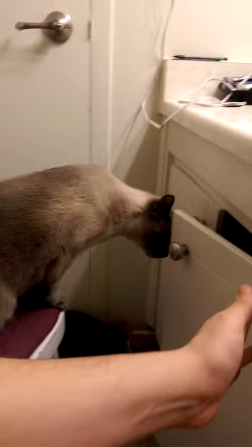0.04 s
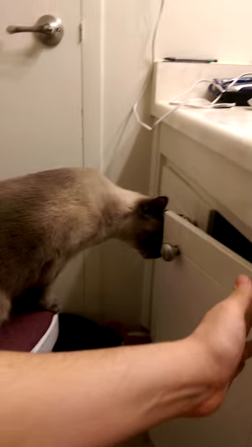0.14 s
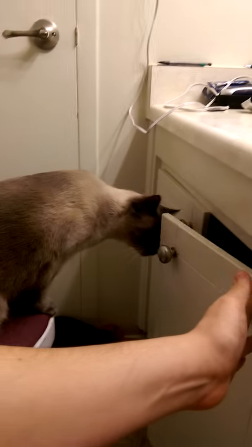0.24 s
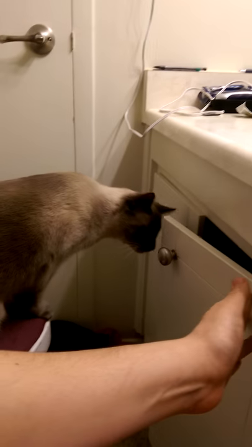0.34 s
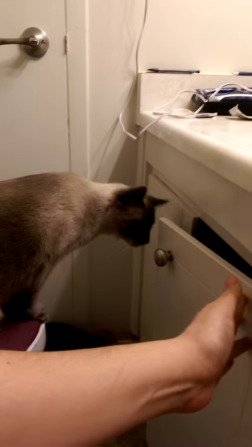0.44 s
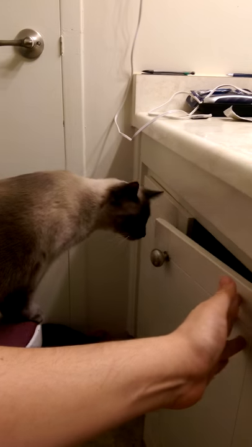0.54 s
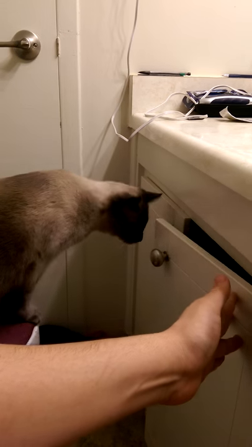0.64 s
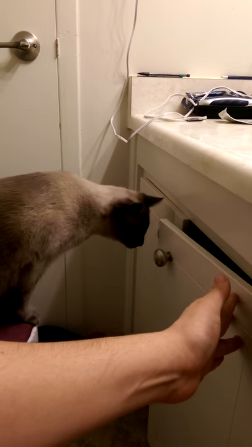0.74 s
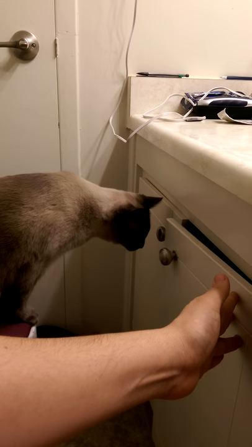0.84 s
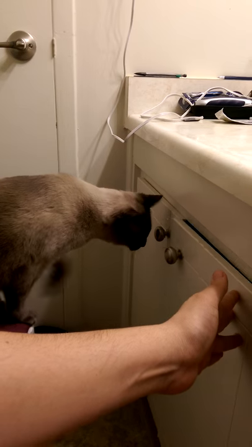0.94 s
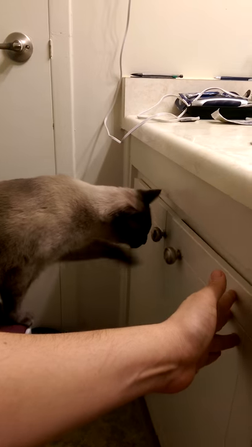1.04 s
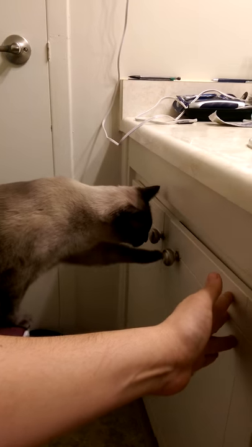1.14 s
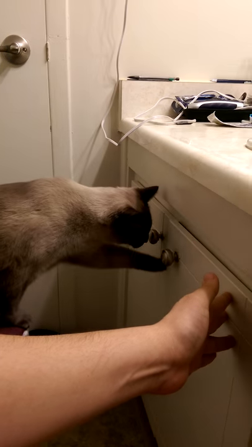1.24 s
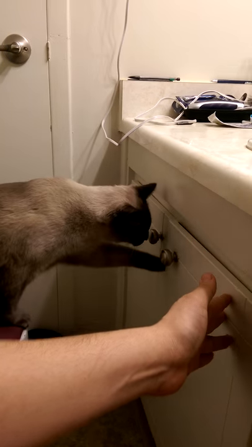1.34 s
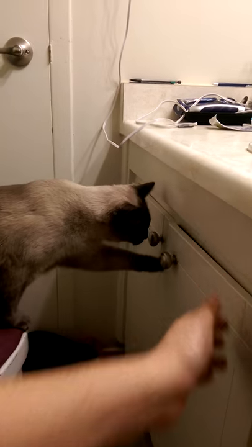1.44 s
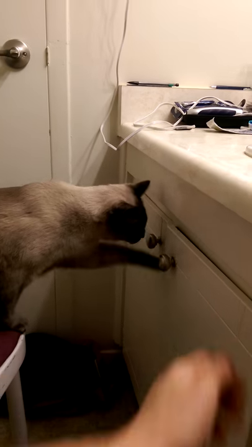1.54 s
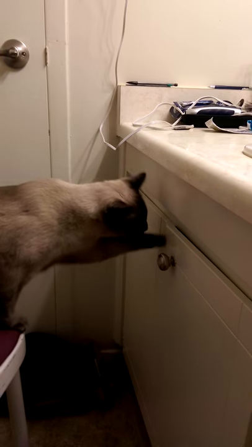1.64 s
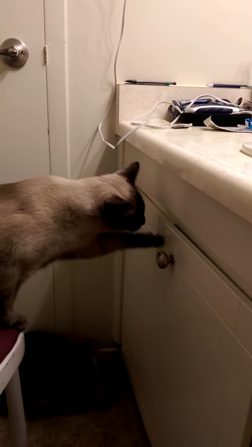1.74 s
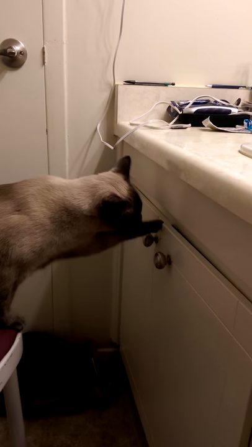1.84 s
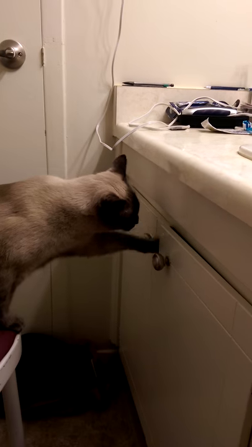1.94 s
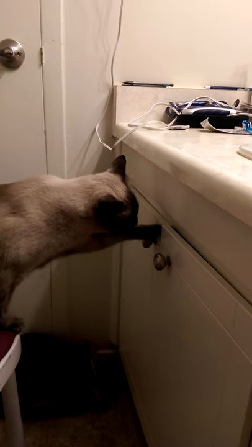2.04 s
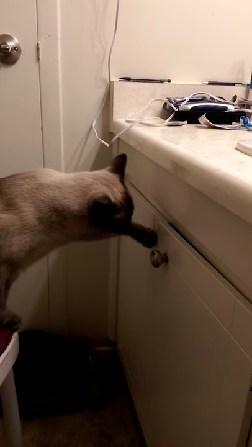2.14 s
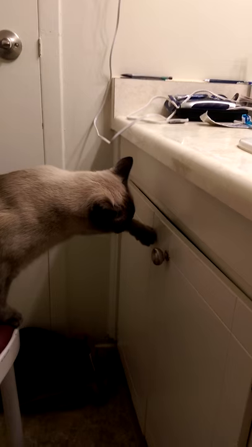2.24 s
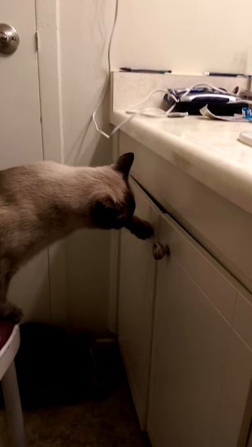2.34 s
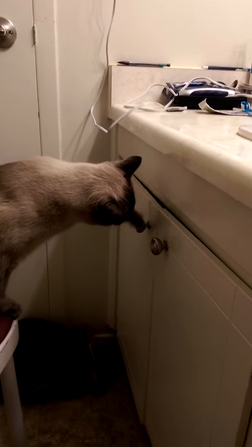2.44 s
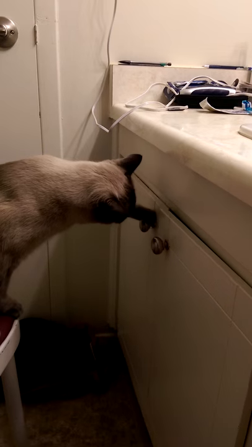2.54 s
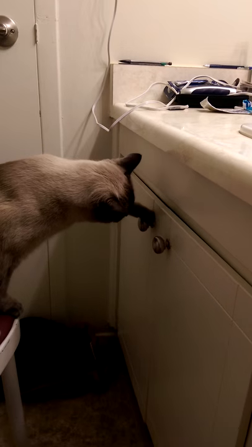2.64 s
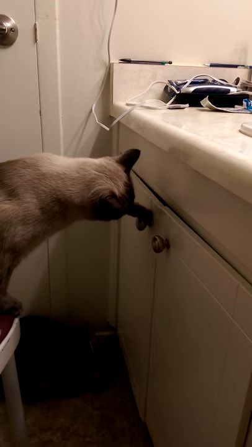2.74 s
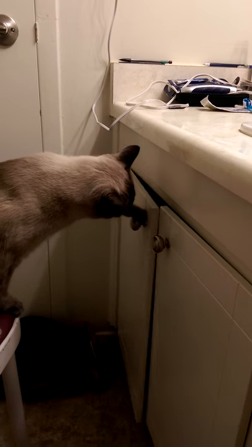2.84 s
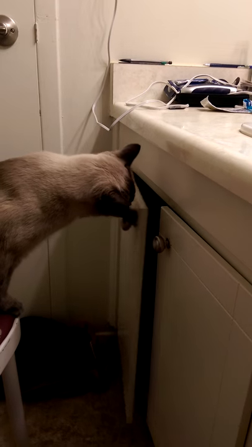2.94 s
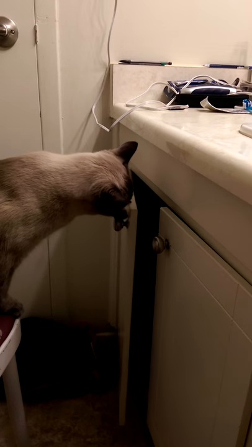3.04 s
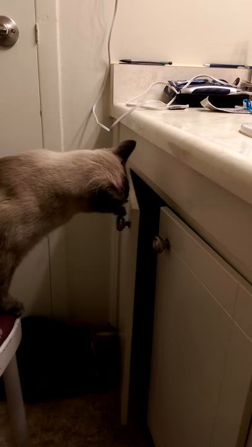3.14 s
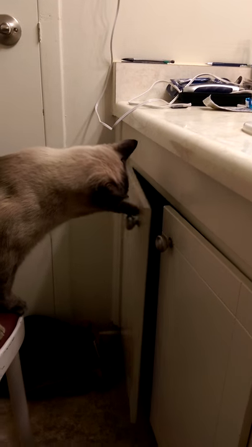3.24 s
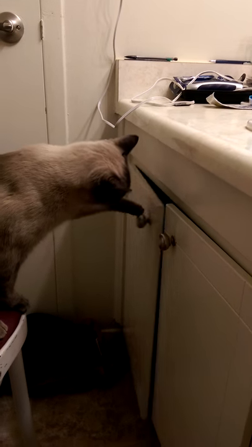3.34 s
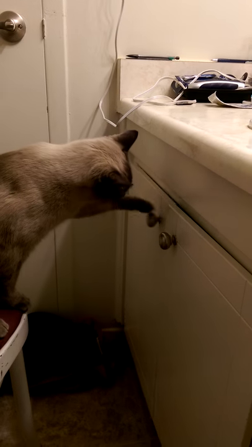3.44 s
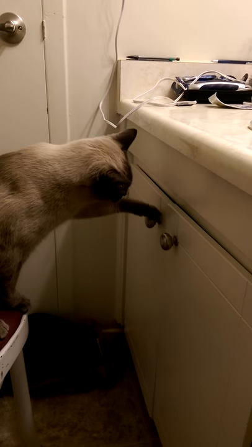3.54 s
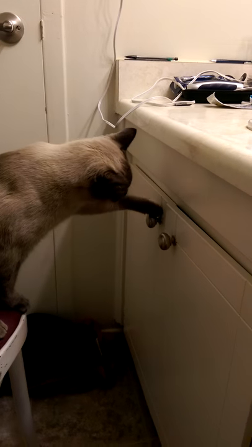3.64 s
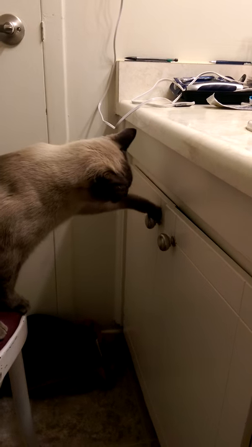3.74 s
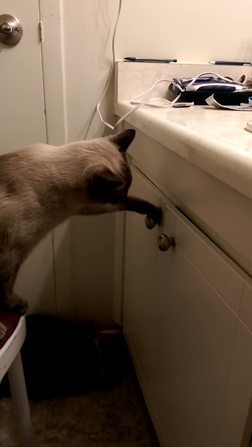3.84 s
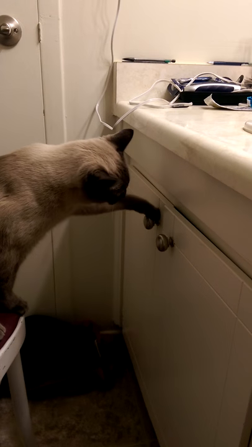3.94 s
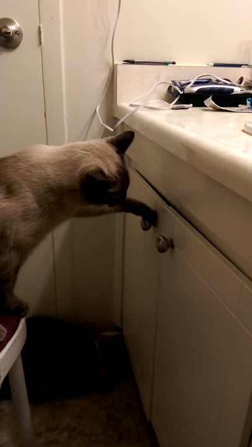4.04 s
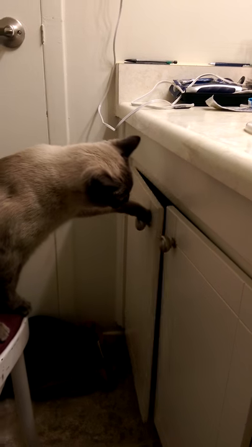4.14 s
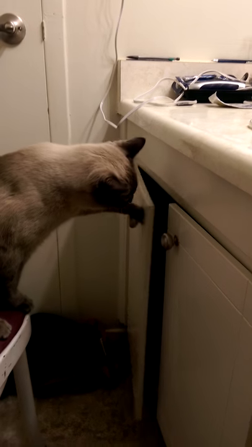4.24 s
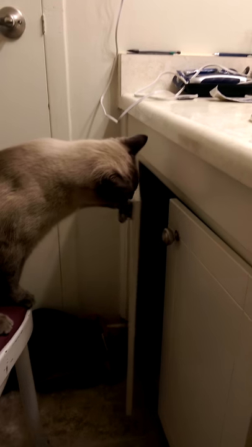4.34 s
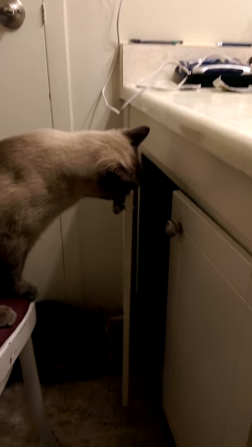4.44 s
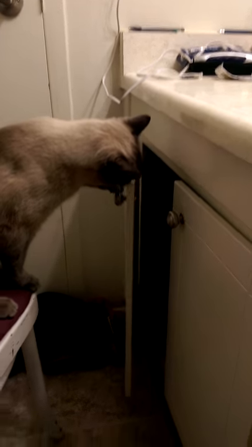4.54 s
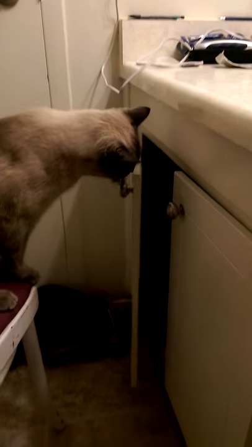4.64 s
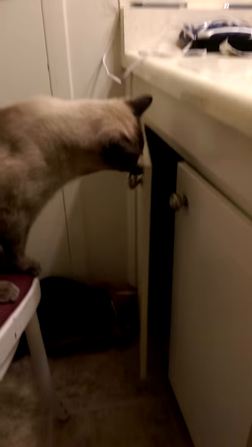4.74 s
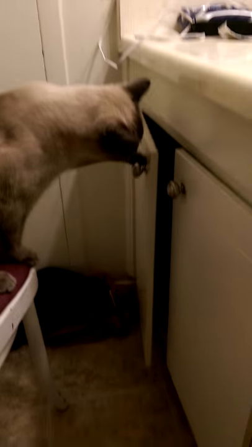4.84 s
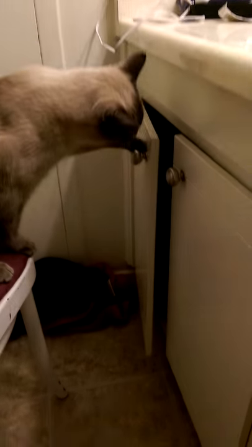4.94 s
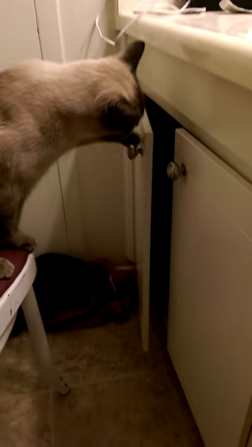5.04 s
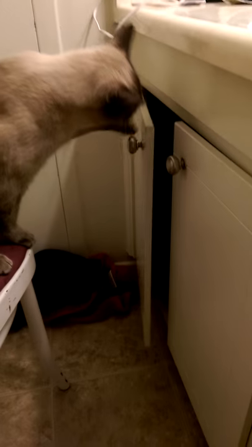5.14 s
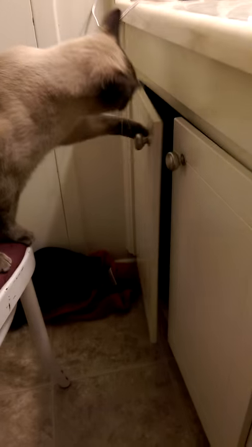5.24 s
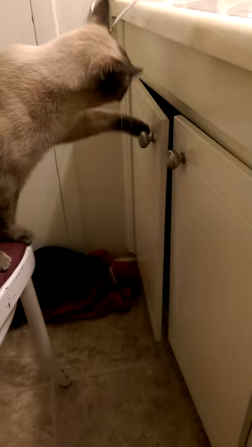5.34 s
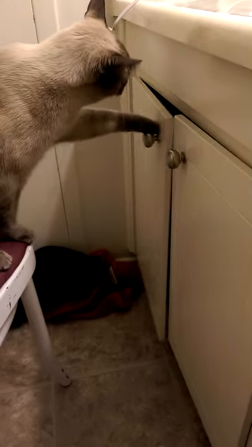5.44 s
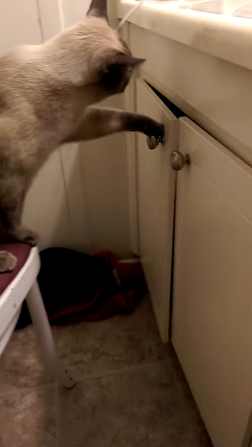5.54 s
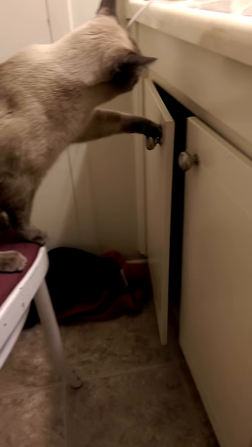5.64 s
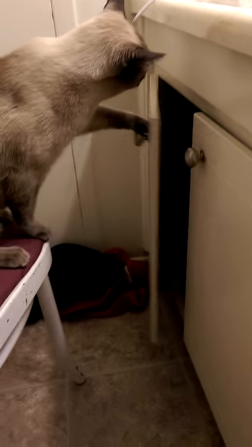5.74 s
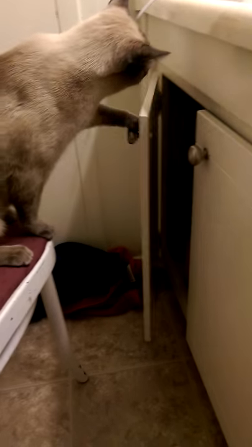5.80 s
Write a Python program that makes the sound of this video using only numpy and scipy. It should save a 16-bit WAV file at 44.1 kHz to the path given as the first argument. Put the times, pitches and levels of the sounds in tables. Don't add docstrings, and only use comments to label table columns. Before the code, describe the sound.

A cat paws at hollow cabinet doors: a dull shut, a quiet tap, then sharp slams and quick rattling in a small hard room.

```python
import sys
import numpy as np
from scipy import signal
from scipy.fft import rfft, irfft, next_fast_len
from scipy.io import wavfile

SR = 44100
rng = np.random.default_rng(int(sys.argv[2]) if len(sys.argv) > 2 else 0)


def invert_db(x):
    u = np.asarray(x, float) / 20
    return 10 ** u


def wav_out(sig):
    wavfile.write(sys.argv[1], SR, np.round(np.clip(np.atleast_2d(sig).T, -1, 1) * 32767).astype(np.int16))


N = 258867

# frequency in Hz, left-right likeness from -1 to 1.
ALIKE = [(60, 1), (190, .97), (320, 0.68), (640, 0.52), (1410, 0.094), (3100, -0.17), (6820, -0.3),
         (15000, -0.64)]
BANDS_HZ = np.geomspace(60, 14000, 13)


def unit(x):
    return x / np.sqrt(np.mean(x ** 2) + 1e-20)


def along(points, hz):
    f, v = np.transpose(points)
    return np.interp(np.log(hz + 1), np.log(f + 1), v)


def filtered(x, response):
    m = next_fast_len(x.shape[-1] + 4096)
    spectrum = rfft(x, m) * response(np.fft.rfftfreq(m, 1 / SR))
    return irfft(spectrum, m)[..., :x.shape[-1]]


def rush(size, spectrum, alike):
    def mid_and_side(hz):
        turn = np.arccos(np.clip(along(alike, hz), -1, 1)) / 2
        return invert_db(along(spectrum, hz)) * [np.cos(turn), np.sin(turn)]

    mid, side = filtered(rng.standard_normal((2, size)), mid_and_side)
    return unit(np.array([mid + side, mid - side]))


def add(out, s, x):
    out[:, round(s * SR):][:, :x.shape[1]] += x


def doors():
    # start in seconds, crack, treble, boom and first front in dB.
    blows = [
        (1.068, -17, -34, 1.5, 6),
        (1.1613, -23.5, -30, -4, 3),
        (2.2353, -34, -22.5, -5, -1.5),
        (2.613, -8.5, -21, -6, 2),
        (3.5415, -5.5, -19, -5.5, 0),
        (3.7292, -11, -23, -8, 0.5),
        (3.8842, -12.5, -23.5, -7, 3),
        (3.9604, -20.5, -34, -8, 1),
    ]
    strike_point = [0, 5, 4, 1, 2, 3, 3, 3]
    # frequency in Hz, level in dB, 60 dB decay in seconds.
    near_door = [(44.2, -19.5, 0.7), (103.7, -5.5, 0.3), (165.5, 2, 0.12), (186.3, 5.5, 0.24),
                 (208, -4.5, 0.35), (250, -7.5, 0.43), (358.7, 0.5, 0.18), (398.5, -19, 0.62),
                 (467.6, -6, 0.2), (490, -27, 0.47), (766.6, -22, 0.11), (1700, -18.5, 0.12),
                 (1740, -20, .1)]
    far_door = [(55.06, -8, .5), (72, -17, 0.3), (100, -9, 0.24), (135, -9.5, 0.078), (155.4, -1.5, 0.3),
                (212.5, 0, 0.43), (257.4, -1, 0.3), (281, -2, 0.3), (303.5, 5, 0.13), (363, -5, .32),
                (397, -7, .32), (418, -9.5, .27), (526, -11, 0.26)]
    slam = [(63.7, -2.5, 0.42), (117.6, -3.5, 0.27), (155.8, 2, 0.4), (210.7, -12, 1), (250.3, -3, 0.27),
            (338, -3.5, 0.28), (427, -7.5, 0.33), (485.7, -16, 0.52)]
    rattle = [(60.8, -8, 0.72), (82, 0, 0.23), (154.8, 1, 0.31), (222, -8.5, .5), (253.2, 1.5, 0.22),
              (339.5, -8.5, 0.35), (415.4, -4.5, .27), (528, -7.5, 0.33)]
    tap = [(60, -7, 0.5), (102, -8.5, 0.41), (159, -8.5, 0.75), (210.7, 0, 0.21), (248.7, 2.5, 0.27),
           (281.2, -4.5, .2), (395.4, -18, 0.15), (478, -7, 0.23), (1713, 2.5, 0.1), (1900, 4.5, 0.107),
           (2070, -1.5, 0.09)]
    rebound = [(64.7, -1, .6), (92.8, -10, 0.66), (127.1, 0, 0.44), (168.4, -2, 0.48), (192, 1.5, 0.25),
               (210.2, 5, 0.39), (223, -20, 0.25), (322, -21, 0.24), (432, -16.5, .25), (556, -20, 0.33),
               (745, -28, 0.19)]
    # frequency in Hz, level in dB, 60 dB decay in seconds.
    panel = [(709, 0.5, 0.14), (772, -3, 0.25), (831, 0.5, .18), (944, -3, 0.19), (983, 0.5, .2),
             (1362, -5.5, 0.11), (1397, -3.5, 0.16), (1862, -0.5, .15), (2032, -3.5, 0.2),
             (2105, -5.5, 0.2), (2230, -8.5, 0.2), (2444, 0.5, 0.17), (2768, -7, 0.16), (3080, -6, 0.11)]
    # frequency in Hz, width in Hz, level in dB.
    hard_crack = [(1930, 2200, -2), (3200, 1700, -5), (8440, 2000, -13)]
    # frequency in Hz, width in Hz, level in dB.
    pushed_crack = [(1340, 610, 6), (2470, 460, 1), (8600, 3200, -17)]
    strike_modes = [near_door, far_door, slam, rattle, tap, rebound]
    near_mid_db, far_mid_db = -4, -8.5
    push_hz, push_t60_s, push_db = 85, 0.13, -15.5

    out = np.zeros((2, N + SR))
    t = np.arange(int(.9 * SR)) / SR
    shared_room = answers(len(t), late_slower=7.3)
    panel_t = t[:SR // 4]
    damping = invert_db(-(panel_t / .022) ** 2)
    hard = fronts(hard_crack, walls_db=-3.5)
    pushed = fronts(pushed_crack, walls_db=-18.5)
    push = np.minimum(t * push_hz, 1) * np.sin(2 * np.pi * push_hz * t)
    for (s, db, treble_db, boom_db, front_db), point in zip(blows, strike_point):
        mid_db = near_mid_db if point in (0, 5) else far_mid_db
        low, mid, high = pushed if point == 0 else hard
        tone = [(90, boom_db - 6.0), (300, boom_db + 0.5), (500, boom_db - 2.0), (700, mid_db + 3.0),
                (2200, -1.0), (4000, 0.57 * (treble_db + 22)), (7000, treble_db + 16.0)]
        tilt = invert_db(along(tone, BANDS_HZ))
        room = 0.73 * shared_room + .7 * answers(len(t), late_slower=3)
        add(out, s, invert_db(db - 6.5) * np.tensordot(tilt, room, 1))
        add(out, s, invert_db(db + boom_db - 5.0) * boom(strike_modes[point], t, swell=.006))
        add(out, s, (push * invert_db(db + push_db - 60 * t / push_t60_s))[None])
        add(out, s, invert_db(db - 17.5) * boom(panel, panel_t, swell=.002) * damping)
        add(out, s, invert_db(db + front_db + 25.0) * (low - mid + invert_db(treble_db + 16.5) * high))
    return out[:, :N]


def fronts(crack, walls_db):
    # delay in seconds, left level in dB, right level in dB.
    walls = [(0, 5.5, -6), (.0031, -4.5, -2.5), (.0047, -7.5, -2.5), (.0058, -5.5, -5), (.0075, -4, -8),
             (.0095, -9.5, -4.5), (0.0116, -10.5, -8.5)]
    echoes = np.zeros((2, SR // 30))
    for s, left_db, right_db in walls:
        level = invert_db(np.array([left_db, right_db]) + walls_db * (s > 0))
        sign = rng.choice([-1, 1], 2) if s > .004 else 1
        echoes[:, 20 + round(s * SR)] = level * sign

    def mode(f, c, w):
        return 1j * f * w / (c * c - f * f + 1j * f * w)

    def front(c, w, db):
        def response(f):
            return invert_db(db) * mode(f, c, w) * mode(f, c, 3 * w) / (1 + 1j * f / (0.62 * c)) ** 2
        return filtered(echoes, response)

    return [front(c, w, db) for c, w, db in crack]


def boom(modes, t, swell):
    hz, db, t60 = np.transpose(modes)[:, :, None]
    wander = np.cumsum(rng.standard_normal((len(modes), len(t))), 1)
    drift = wander * (.6 + hz / 220) / np.sqrt(SR)
    apart = np.minimum(hz / 480, np.pi / 2) ** 1.1 * (-1) ** np.arange(len(modes))[:, None]
    start = rng.uniform(0, 2 * np.pi, hz.shape) * (hz > 600)
    grow = 1 - np.exp(-t / (swell + 0.4 / hz))
    level = invert_db(db - 60 * t / t60) * grow
    phase = 2 * np.pi * hz * t + drift + start
    left = (level * np.sin(phase + apart / 2)).sum(0)
    right = (level * np.sin(phase - apart / 2)).sum(0)
    return np.array([left, right])


def answers(size, late_slower):
    # frequency in Hz, density in dB per Hz.
    wood = [(30, -30), (60, -6), (400, -4.5), (3400, -16.5), (5500, -31), (8500, -32), (13000, -33),
            (15800, -48.5)]
    # frequency in Hz, 60 dB decay in seconds.
    room_decay = [(40, 0.51), (110, 0.85), (280, .4), (740, .2), (1400, 0.17), (3600, .13), (6000, 0.13),
                  (13500, 0.11)]
    # frequency in Hz, level below the first answer in dB.
    late_tail = [(60, -29.5), (150, -32), (400, -35.5), (1500, -38.5), (8000, -43)]
    t = np.arange(size) / SR
    noise = rush(size, wood, ALIKE)
    steps = np.arange(len(BANDS_HZ))
    band_steps = list(zip(BANDS_HZ, steps))

    def band(k):
        return filtered(noise, lambda hz: np.clip(1 - abs(along(band_steps, hz) - k), 0, 1))

    t60 = along(room_decay, BANDS_HZ)[:, None]
    late_db = along(late_tail, BANDS_HZ)[:, None]
    fall = invert_db(-60 * t / t60) + invert_db(late_db - 60 * t / (late_slower * t60))
    rise = 1 - np.exp(-t / (.0012 + 0.3 / BANDS_HZ[:, None]))
    return np.array([band(k) for k in steps]) * (fall * rise)[:, None]


def claws():
    # start in seconds, level in dB, treble in dB, 60 dB decay in seconds.
    ticks = [(.403, -54, -7, 0.05), (0.529, -73, 0, 0.078), (0.624, -60, -7, .08), (1.019, -65.5, -6, 0.12),
             (1.0726, -43, 3, 0.12), (1.192, -50.5, -4.5, 0.067), (1.2178, -48.5, -39, 0.13),
             (1.2647, -59.5, -2.5, 0.13), (1.4137, -60, -7, 0.14), (1.6435, -66, -8.5, 0.057),
             (1.6792, -72.5, 0.5, 0.075), (2.5262, -58.5, -9, 0.062), (2.742, -62, 1.5, 0.13),
             (2.9793, -66.5, 3, 0.06), (3.2148, -58.5, -9.5, 0.089), (3.52, -60.5, -3.5, 0.047),
             (3.528, -61.5, -11.5, 0.04), (3.671, -51, -9, 0.12), (3.683, -56, -12.5, 0.1),
             (3.717, -68.5, 11, 0.026), (4.4995, -73, 2, 0.066), (4.6193, -69, -5, 0.07),
             (5.208, -61, -8, 0.15), (5.6392, -71, -1, 0.062)]
    # frequency in Hz, density in dB per Hz.
    claw_colour = [(300, -25), (800, -4), (2200, 5.5), (4500, -1.5), (6000, -9.5), (9500, -8), (13000, -15),
                   (15800, -23.5)]
    out = np.zeros((2, N + SR))
    t = np.arange(SR // 5) / SR
    for s, db, treble_db, t60 in ticks:
        puff = rush(len(t), claw_colour, ALIKE)
        treble = [(3500, 1), (6000, treble_db + 5.0)]
        puff = filtered(puff, lambda hz: invert_db(along(treble, hz)))
        decay = invert_db(-60 * t / t60) + invert_db(-2.5 - 60 * t / 0.0076)
        add(out, s, invert_db(db - 3.0) * puff * decay)
    return out[:, :N]


def hinge_and_paw():
    # start in seconds, length in seconds, level in dB, resonance in Hz.
    scuffs = [(1.55, 0.035, -64.5, 2040), (2.145, 0.012, -71, 1490), (2.43, 0.12, -74, 1660),
              (3.1, 0.029, -71, 1700), (3.15, 0.024, -73, 1560), (3.405, 0.0283, -68.5, 1700),
              (4.24, 0.023, -63.5, 1638), (5.135, 0.039, -71, 1807)]
    # start in seconds, level in dB, main mode in Hz.
    pads = [
        (.258, -64, 198.2),
        (.302, -46, 215.3),
        (4.234, -54, 82),
    ]
    out = np.zeros((2, N + SR))
    t = np.arange(SR // 2) / SR
    for s, length, db, hz in scuffs:
        resonance = [(hz * 0.35, -25), (hz * 1.1, -4), (hz, 0), (hz * 0.73, -4), (hz * 2.3, -25), (hz * 4, -60)]
        grit = rush(len(t), resonance, ALIKE)
        fade = invert_db(-60 * np.clip(t - length, 0, 1) / .06)
        add(out, s, invert_db(db) * grit * np.clip(t / 0.0035, 0, 1) * fade)
    for s, db, hz in pads:
        modes = [(hz, 0, .4), (hz * 0.71, -12, .3), (255, -16, .25), (430, -22, .2)]
        add(out, s, invert_db(db) * boom(modes, t, swell=0.0034))
    return out[:, :N]


def fur():
    # start in seconds, length in seconds, level in dB.
    strokes = [
        (0.299, .15, -81.5),
        (1.803, 0.137, -71),
    ]
    # frequency in Hz, density in dB per Hz.
    fur_colour = [(880, -29), (1500, -3), (2270, -1.5), (2450, -11.5), (3930, 1), (5300, -8.5),
                  (9540, -5.5), (15000, -14)]
    rise_s, fall_db_per_s = .05, 150
    s, length, db = np.transpose(strokes)[:, :, None]
    t = np.arange(N) / SR - s
    fade = invert_db(db - fall_db_per_s * np.clip(t - length, 0, 1))
    level = (np.clip(t / rise_s, 0, 1) * fade).sum(0)
    return level * rush(N, fur_colour, ALIKE)


def phone_shadow(close):
    # frequency in Hz, left minus right in dB.
    shadow = [(60, 3), (200, -0.5), (1290, 0.45), (2380, 1), (4400, 8.5), (8120, 21), (10500, 20),
              (12500, 6.5), (15000, 8)]

    def response(hz):
        half_db = along(shadow, hz) / 2
        return invert_db([half_db, -half_db])

    return filtered(close, response)


def floor():
    # start in seconds, lift in dB, open time in seconds.
    openings = [
        (0, 3, 0.31),
        (0.299, 7.5, 0.33),
        (1.07, 11.5, 0.63),
        (2.235, 6.5, .4),
        (2.613, 7.5, .6),
        (3.54, 15, .4),
        (3.88, 8.5, 0.61),
    ]
    # frequency in Hz, density in dB per Hz.
    air = [(290, -32.5), (500, -4), (750, -6), (806, -4), (1360, -6.5), (1480, -7), (4780, -11),
           (15900, -15)]
    # frequency in Hz, density in dB per Hz.
    house = [(10, -29), (38, -11.5), (60, -7), (110, -3), (250, -7), (450, -12), (700, -24), (910, -46.5),
             (1540, -120)]
    hiss_db, rumble_db = -79.5, -71.5
    rumble_follows = 0.78
    open_s, settle_s, close_s = .03, 0.61, 0.11
    s, db, hold = np.transpose(openings)[:, :, None]
    t = np.arange(N) / SR - s
    gate = np.clip(np.minimum(t / open_s, 1 - (t - hold) / close_s), 0, 1)
    lift_db = (db * np.exp(-abs(t) / settle_s) * gate).max(0)
    hiss = invert_db(hiss_db + lift_db + 7) * rush(N, air, [(500, 0)])
    house_alike = [(60, 0.68), (200, 0.42), (700, .1)]
    rumble = invert_db(rumble_db + rumble_follows * lift_db) * rush(N, house, house_alike)
    return (hiss + rumble) * invert_db([[1.5], [-1.5]])


def scene():
    close = doors() + claws() + hinge_and_paw() + fur()
    return phone_shadow(close) + floor()


def low_pass(x):
    return signal.sosfilt(signal.butter(12, 16480, fs=SR, output="sos"), x)


def record(dry):
    top_hz, offset = 15830, -.0004
    mix = filtered(dry, lambda hz: hz < top_hz) + offset
    return low_pass(mix)


dry = scene()
out = record(dry)
wav_out(out)
```